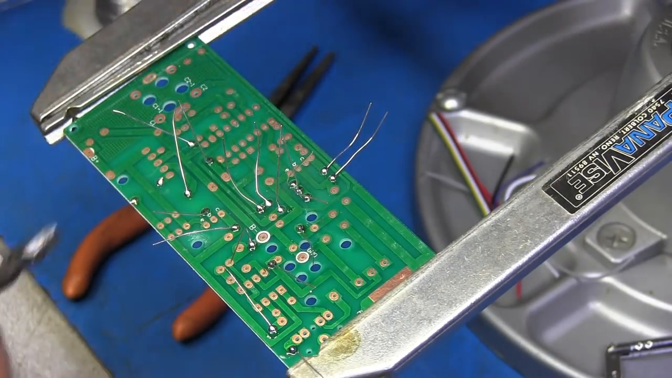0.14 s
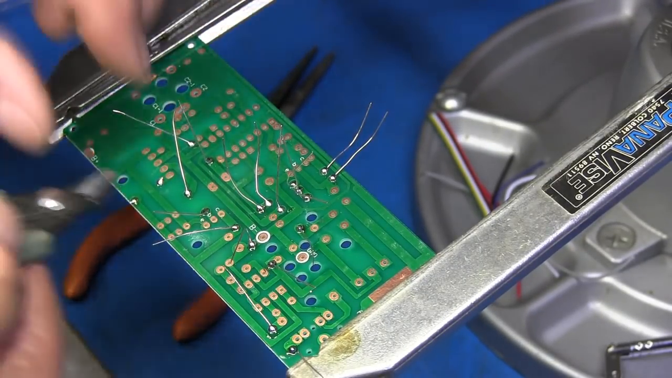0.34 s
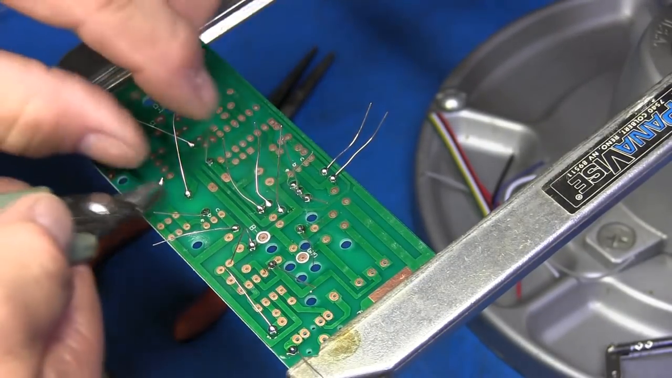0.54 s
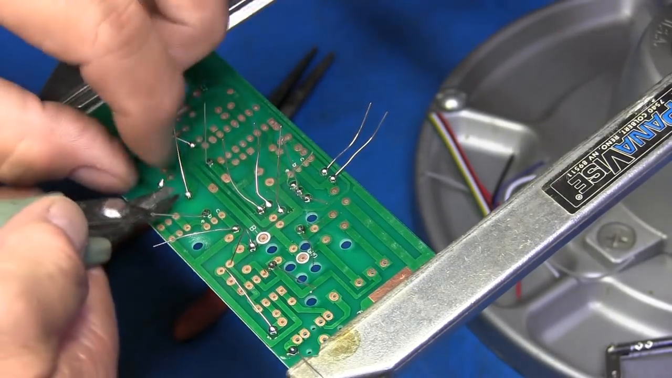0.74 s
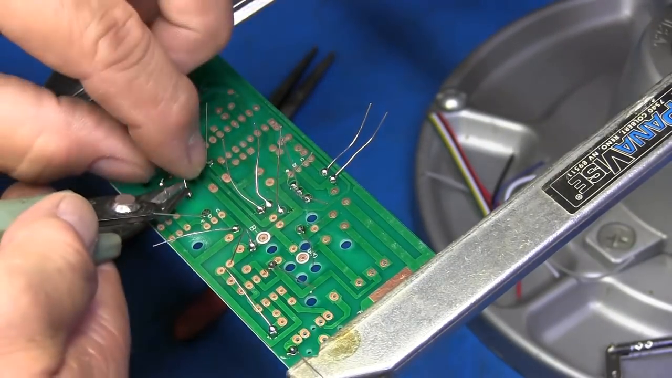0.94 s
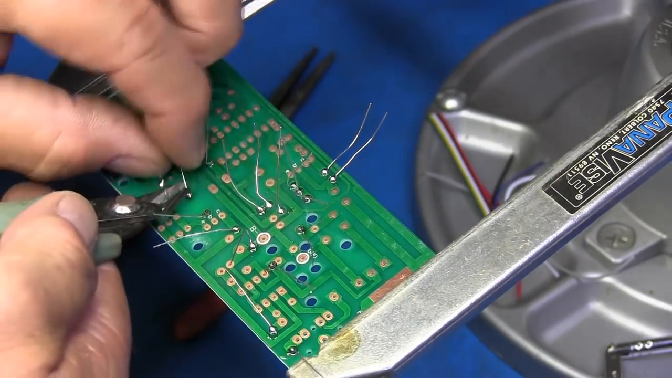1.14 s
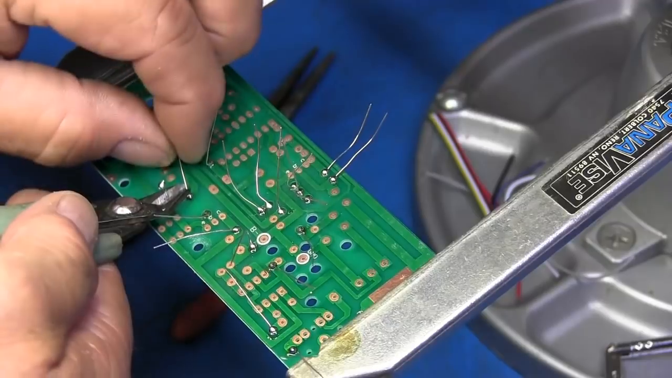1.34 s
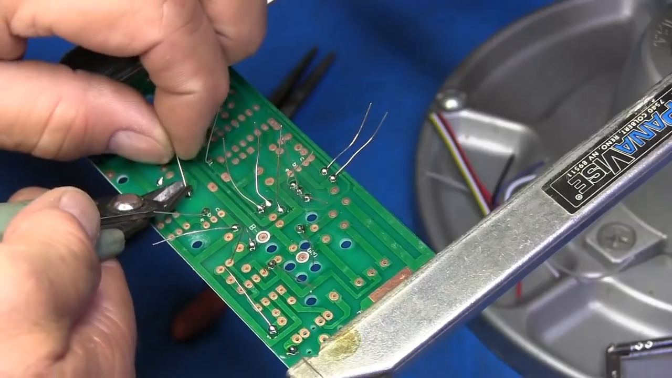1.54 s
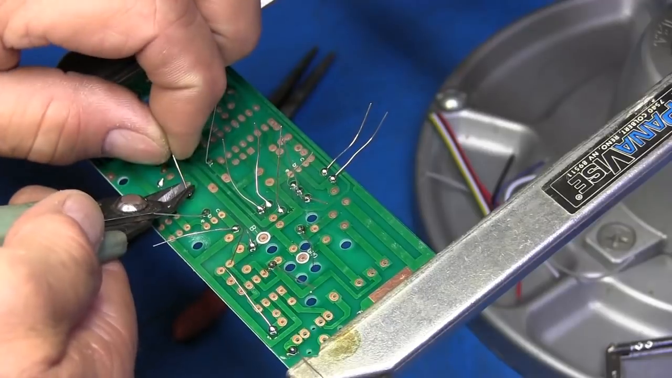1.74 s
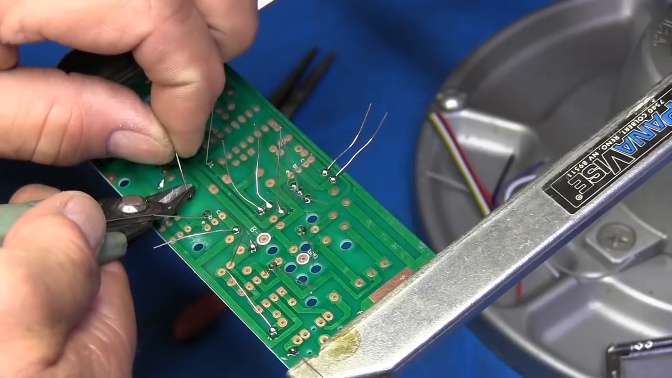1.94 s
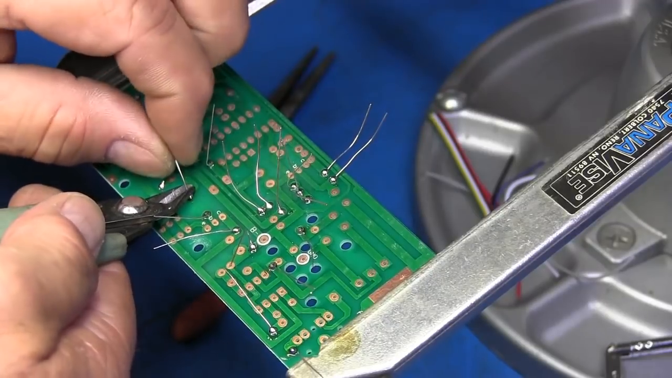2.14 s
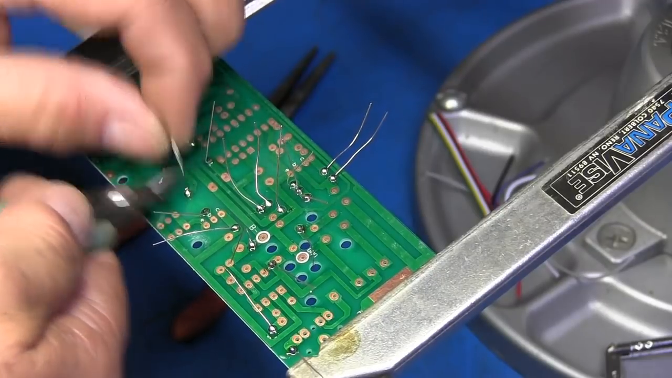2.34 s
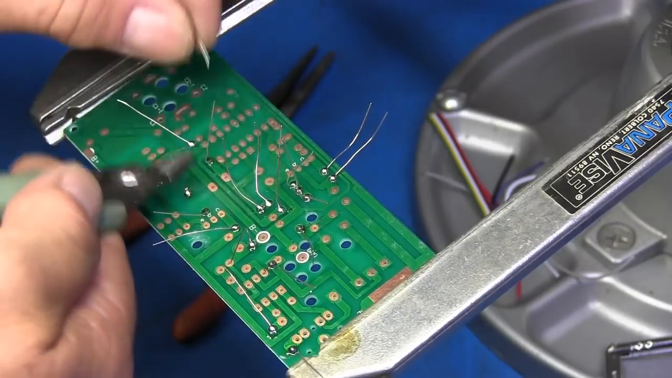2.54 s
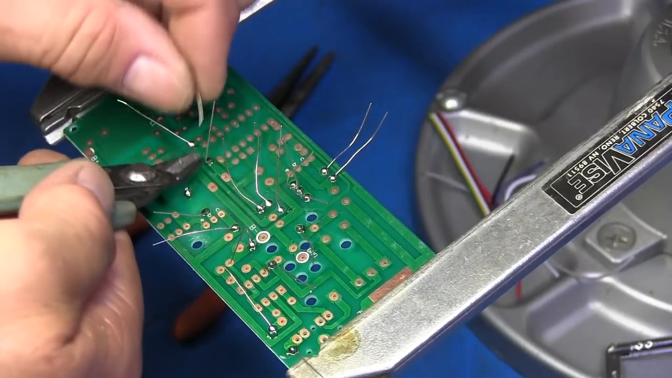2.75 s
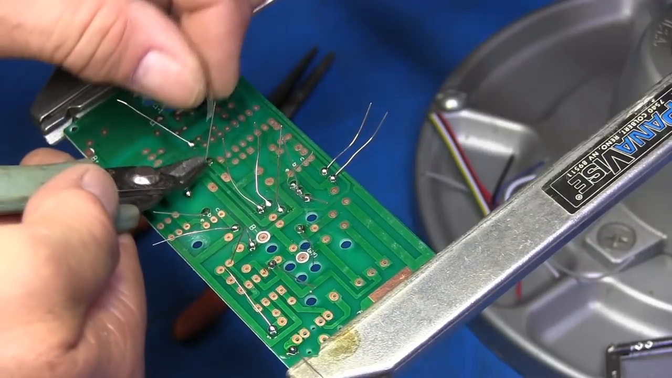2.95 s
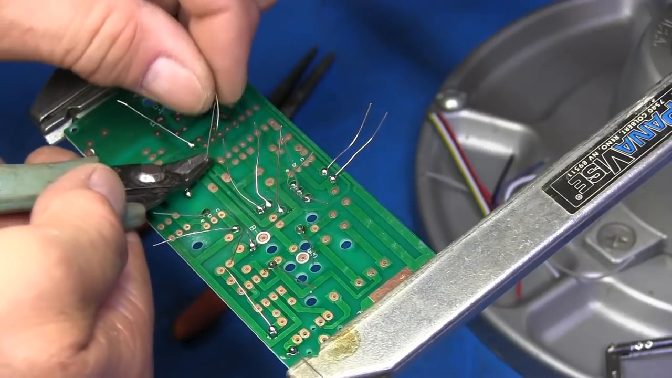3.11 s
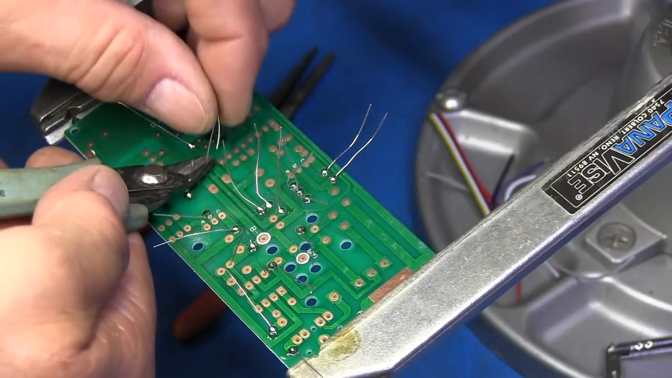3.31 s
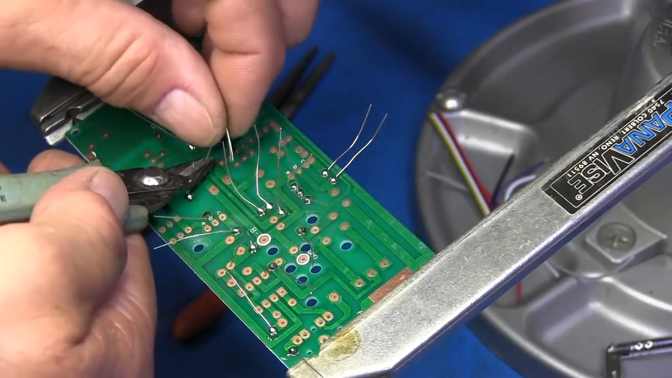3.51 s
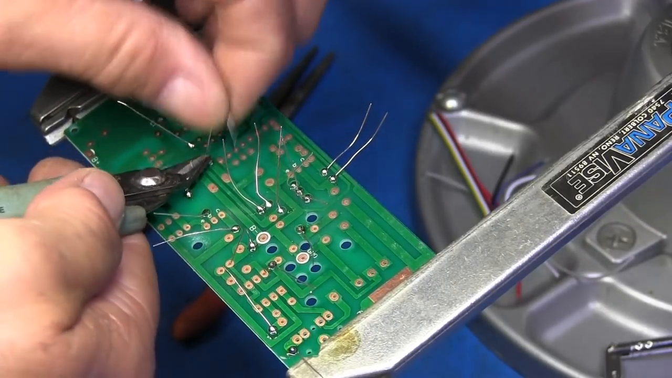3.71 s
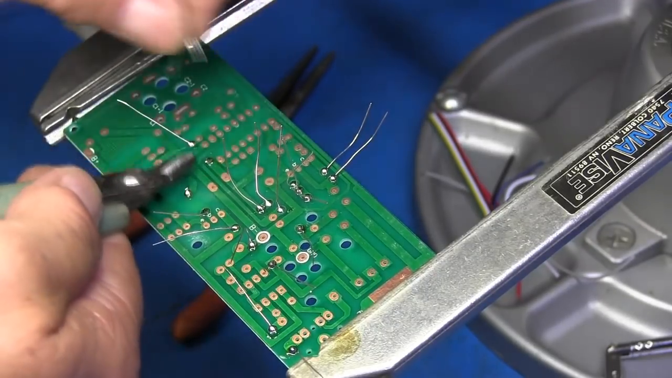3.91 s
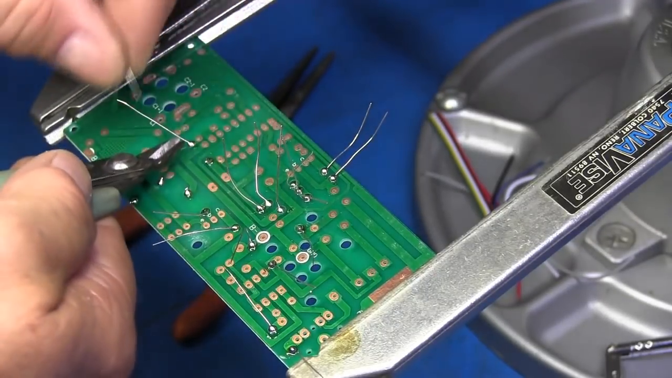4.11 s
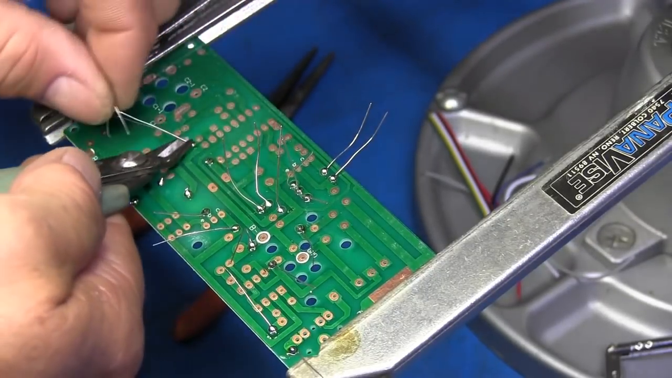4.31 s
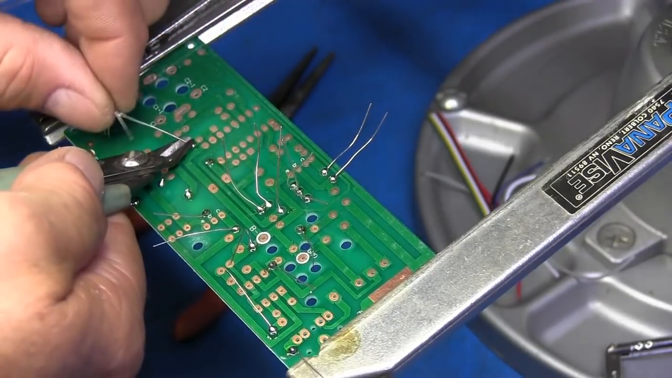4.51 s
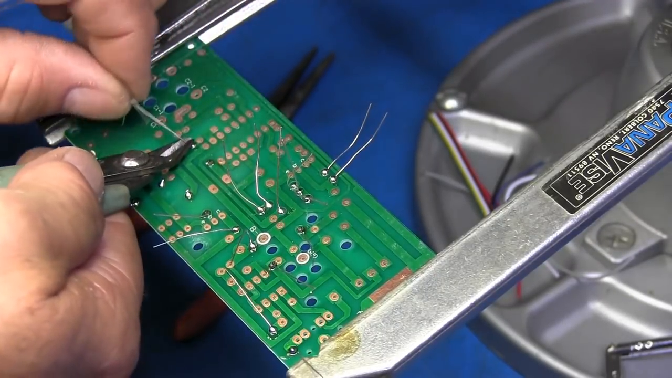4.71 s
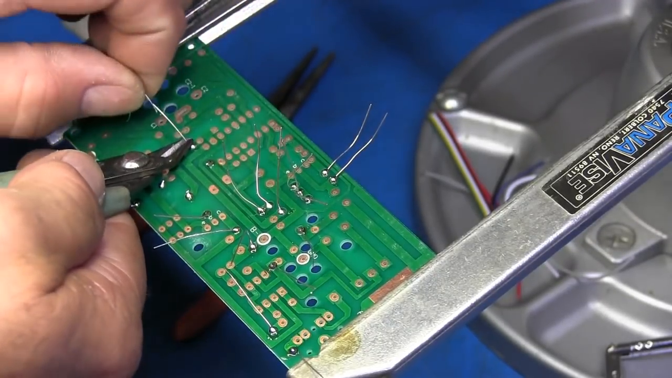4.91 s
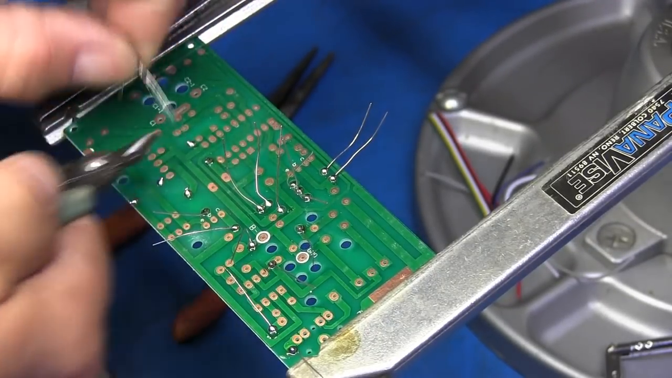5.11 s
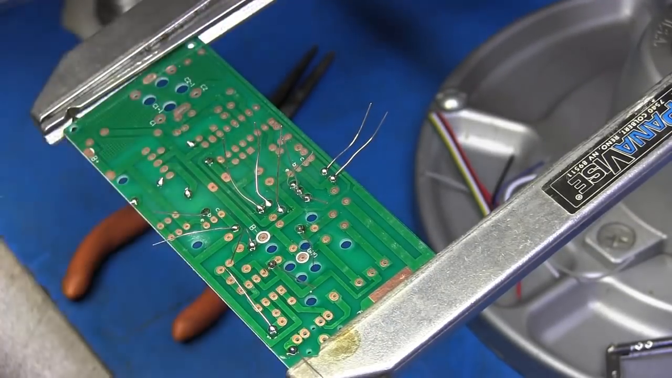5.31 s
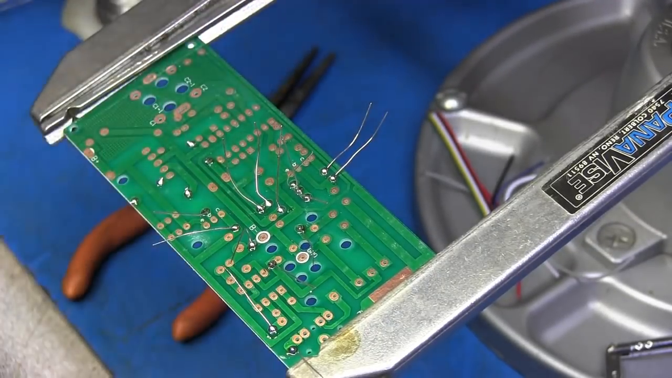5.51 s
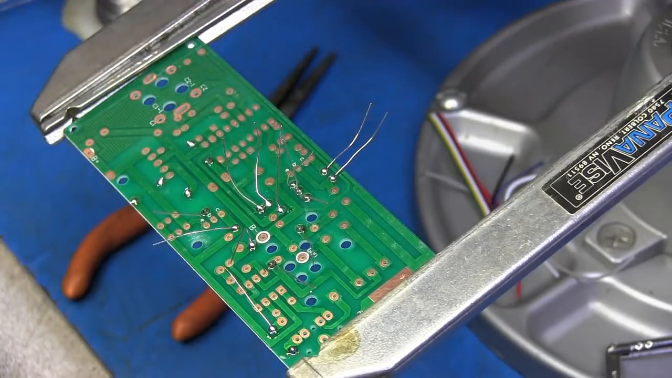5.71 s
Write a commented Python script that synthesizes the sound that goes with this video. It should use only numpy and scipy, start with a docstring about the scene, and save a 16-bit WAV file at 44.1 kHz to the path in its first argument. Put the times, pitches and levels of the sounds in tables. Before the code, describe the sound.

Small cutters snip two wire leads off a circuit board, with light metallic ticks and pings over a steady fan and faint hum.

```python
"""A small workshop, microphone close to a circuit board in a vice; an equipment fan and mains hum throughout.
First a caught lead pings, then flush cutters knock on the board and slide along the leads, spring tinking.
At 2.3 s the jaws bite through a lead and slam shut, a crack with a brief steel ring. More handling, a thin
electronic whine comes in, and at 3.7 s a second, louder snip. One more lead pings, the jaws knock a few
times, and the hands draw away with a soft brushing."""
import sys
import numpy as np
from scipy import signal
from scipy.fft import rfft, irfft
from scipy.io import wavfile
from scipy.ndimage import uniform_filter1d

SR = 44100
rng = np.random.default_rng(int(sys.argv[2]) if len(sys.argv) > 2 else 0)


def unload_wav(signal):
    """Save mono or channel-first audio to the path in sys.argv[1] as 16-bit WAV at rate SR, clipped to [-1, 1]."""
    wavfile.write(
        sys.argv[1],
        SR,
        np.round(np.clip(np.atleast_2d(signal).T, -1, 1) * 32767).astype(np.int16),
    )


N = 258426
TIME = np.arange(N) / SR
RING_TIME = TIME[:8000]  # time axis of one blow as it dies away
BAND_LIMIT_HZ = 15900

# fan and room air: freq_hz, relative_db
FAN_SPECTRUM = [(20, -18), (45, -14.5), (100, -12.5), (170, -5), (300, -3.5), (480, -10), (700, -15.5),
                (1300, -16.5), (2000, -21), (3000, -27), (5000, -33.5), (8000, -39), (12000, -43.5),
                (16000, -47.5)]
# resonances of housing and room: centre_hz, width_hz, lift_db
FAN_RESONANCES = [(184.3, 11.2, 6), (281, 20, 3), (299, 16, -3), (346, 23, 5.5), (386, 22, -4),
                  (419.6, 25, 4), (554.5, 45, 4), (819, 88, 5.5), (893, 25, 14), (1068, 69, 5.5),
                  (4040, 160, 1.5)]
# stereo width of the fan: freq_hz, side_db
FAN_SIDE = [(40, -20), (150, -14.5), (350, -11.5), (700, -8.5), (1200, -7), (3000, -5.5), (7000, -7.5),
            (14000, -36)]
# how the fan leans at the microphone: freq_hz, left_minus_right_db
FAN_BALANCE = [(60, -5.5), (130, -3.5), (290, -0.5), (640, 1.5), (1410, -0.5), (3100, 0.5), (6820, -0.5),
               (15000, 0.5)]
# tones of mains and motors: pitch_hz, rms_db, channel_phase_rad
HUM_TONES = [(36, -59.3, .3), (59.3, -60, .4), (71, -69, .4), (98, -66, .4), (120, -61, .4), (586, -65, .8),
             (875.7, -53.3, .8)]
# the whine and the brushing each come and go: start_s, attack_s, end_s, release_s, rms_db
WHINE_SWELL = (3.45, .12, 5.7, .15, -76.3)
BRUSH_SWELL = (5.15, .15, 5.72, .22, -63)

# first reflections off board, vice and bench: delay_s, gain
NEAR_ECHOES = [(.00021, 0.17), (.00048, 0.4), (.0015, .22), (.0086, 0.091)]
# decay of the room: freq_hz, t60_s
ROOM_DECAY = [(1000, 0.46), (2600, 0.15), (7000, 0.19), (10000, 0.15), (15000, 0.16)]
# stereo width of the reflections: freq_hz, side_db
REFLECTION_SIDE = [(1000, -4), (2500, -16), (4500, -5), (8000, -10), (13000, -12)]

# modes of cutters and board, struck at the tips or deep in the jaws: pitch_hz, tip_db, deep_db, t60_s
CUTTER_MODES = [(2183, 2, 3, .11), (2522, 0, -1, .10), (2790, -5, -8, .08), (3075, -7, 0, .11),
                (3950, -4, -8, .08), (4262, 2, -6, .09), (4665, -5, 4, .10), (4735, -1, -4, .10),
                (5360, -12, -1, .10), (5900, -6, -9, .07), (6952, -9, 1, .08), (7380, -2, -8, .07),
                (7530, -9, -2, .07), (8785, -2, -3, .09), (8930, -1, -9, .09), (9935, -14, 2, .06),
                (11650, -3, -12, .07), (12420, -10, -5, .065), (14480, -12, -8, .06)]
# steel touching the board: freq_hz, relative_db
TOUCH_SPECTRUM = [(200, -22), (1200, -2), (1800, -3), (2250, -6), (3100, 2), (3600, -5), (4300, 0),
                  (5200, -9), (7000, -10), (9200, -9), (15500, -13.5)]
# modes of the cutters' spring: pitch_hz, relative_db
SPRING_MODES = [(7700, -12), (8500, -15), (9800, -9), (11080, 0), (12080, -8)]
# the spring slips as the grip changes: start_s, level_db
SPRING_TINKS = [(0.9575, -22), (1.903, -37), (2.043, -34), (3.337, -33), (4.593, -29.5)]
# an edge slides along a lead: start_s, level_db, slide_s
LEAD_SCRAPES = [(1.212, -26.5, .018), (2.273, -26, .002), (2.479, -28.5, .0011), (3.009, -20.5, 0.013),
                (3.262, -27, 0.0024), (3.5406, -21.5, 0.0096), (3.898, -26, .001)]
# the jaws knock on the board: start_s, level_db, contact_s
BOARD_KNOCKS = [(0.8312, -16, 0.00033), (1.4822, -20.5, 0.0012), (3.172, -11.5, 0.0015), (4.3, -13, 0.005),
                (4.857, -23, 0.0034), (4.946, -20, .0022), (5.049, -15.5, 0.0033), (5.175, -23.5, 0.0029)]
# a lead's first bending mode, split in three: ratio_to_pitch, relative_db
LEAD_LOW_MODES = [(0.933, -4.5), (1.001, 1), (1.08, -5.5)]
# its higher bending modes: ratio_to_second_bend, relative_db
LEAD_HIGH_MODES = [(.825, -11.5), (.988, -6), (1.001, -1), (1.035, -5.5), (1.86, -14)]
# flicked leads: start_s, level_db, pitch_hz, second_bend_ratio, hardness_db, chatter_s, t60_s
LEAD_PINGS = [(0.641, -13.5, 4077, 2.506, -3, 0.0066, 0.039), (0.646, -12.5, 4084, 2.506, 1, 0.0012, 0.055),
              (1.047, -35, 7150, 2.7, -20, .015, .04), (2.408, -31, 8500, 2.7, -15, .003, .013),
              (2.951, -23, 3180, 2.7, -22, 0.0018, 0.022), (4.379, -14.5, 2865, 2.836, 3.5, 0.0022, 0.05)]
# the jaws slamming shut: freq_hz, relative_db
SNIP_SPECTRUM = [(200, -34), (1000, -15.5), (1750, -10), (2300, -1), (3200, 1), (3700, 0), (4600, 3.5),
                 (6200, -4.5), (7000, 0), (9500, -2.5), (11000, -5), (14500, -3.5), (16000, -33)]
# the two cuts: start_s, level_db, dull_hz, thin_hz, ring_db, room_db, depth (0 tips, 1 deep in the jaws)
LEAD_SNIPS = [(2.3158, -0.2, 8900, 1490, 1.5, -4.5, 0), (3.7302, 5.5, 15700, 600, -3.5, -2.5, 1)]


def amp(db):
    """Decibels to gain."""
    return np.exp(np.log(10) * np.asarray(db) / 20)


def unit(x):
    """Scales to an average energy of one per channel."""
    return x / np.sqrt(np.mean(np.sum(x ** 2, -1)) + 1e-20)


def read(points, hz):
    """Reads a table on a log-frequency axis."""
    freq_hz, value = np.transpose(points)
    return np.interp(np.log(hz + 1), np.log(freq_hz + 1), value)


def add(mix, start_s, sound):
    """Mixes a sound in at its start time."""
    part = mix[:, round(start_s * SR):][:, :sound.shape[-1]]
    part += sound[..., :part.shape[-1]]


def convolve(a, b):
    """Convolution along time, cut to the length of one ring."""
    return signal.fftconvolve(np.atleast_2d(a), np.atleast_2d(b), axes=1)[:, :len(RING_TIME)]


def noise(gain):
    """Noise of rms one, shaped by a gain for each frequency bin."""
    return unit(irfft(rfft(rng.standard_normal(N)) * gain, N)) * np.sqrt(N)


def spread(pair, side_points):
    """Takes two unrelated signals as mid and side; returns left and right."""
    size = pair.shape[-1]
    side = irfft(rfft(pair[1]) * amp(read(side_points, np.fft.rfftfreq(size, 1 / SR))), size)
    return np.array([pair[0] + side, pair[0] - side])


def swell(start_s, attack_s, end_s, release_s, db):
    """A gain that rises, holds and falls away."""
    return amp(db) * np.clip(np.minimum((TIME - start_s) / attack_s, (end_s - TIME) / release_s), 0, 1)


def fan(level_db=-39.5):
    """The room tone: steady air noise, coloured by the resonances of housing and room."""
    hz = np.fft.rfftfreq(N, 1 / SR)
    lift_db = sum(db * .5 ** ((2 * (hz - centre) / width) ** 2) for centre, width, db in FAN_RESONANCES)
    side_power_db = 10 * np.log10(1 + amp(read(FAN_SIDE, hz)) ** 2)
    colour = amp(read(FAN_SPECTRUM, hz) + lift_db - side_power_db)
    air = spread(np.array([noise(colour), noise(colour)]), FAN_SIDE)
    lean = amp(np.outer([.5, -.5], read(FAN_BALANCE, hz)))
    return amp(level_db) * irfft(rfft(air) * lean, N)


def hum(waver_rad=0.63, waver_hz=2.2):
    """Tones of mains and motors, the higher ones wavering a little."""
    waver = waver_rad * noise(np.exp(-np.fft.rfftfreq(N, 1 / SR) / waver_hz))
    out, top_hz = np.zeros((2, N)), HUM_TONES[-1][0]
    for hz, db, apart_rad in HUM_TONES:
        phase = 2 * np.pi * (hz * TIME + rng.random()) + waver * hz / top_hz
        out += amp(db) * np.sin([phase + apart_rad / 2, phase - apart_rad / 2])
    return np.sqrt(2) * out


def whine(pitch_hz=13184):
    """A thin electronic tone far above the hum."""
    return np.sqrt(2) * swell(*WHINE_SWELL) * np.sin(2 * np.pi * pitch_hz * TIME)


def brush(centre_hz=11000, width_hz=6000):
    """Fine, high friction noise as the hands draw away."""
    hz = np.fft.rfftfreq(N, 1 / SR)
    return swell(*BRUSH_SWELL) * noise(np.exp(-((hz - centre_hz) / width_hz) ** 2))


def scatter(t60_s):
    """Dense dying reflections, evened out in colour."""
    fade = amp(-60 * RING_TIME / t60_s)
    spectrum = rfft(rng.standard_normal((2, len(RING_TIME))) * fade)
    colour = np.sqrt(uniform_filter1d(abs(spectrum) ** 2, size=80, axis=1))
    return unit(irfft(spectrum / colour, len(RING_TIME)) * (RING_TIME < 2 * t60_s))


def workshop(room_db, vice_db=-4, vice_t60_s=0.012, bench_db=-0.6, bench_t60_s=0.046, build_s=0.0051):
    """The path to the close microphone: direct sound, echoes, vice and bench scatter, short room tail."""
    direct = np.zeros(len(RING_TIME))
    direct[0] = 1
    for delay_s, gain in NEAR_ECHOES:
        direct[round(delay_s * SR)] += gain
    near = amp(vice_db) * scatter(vice_t60_s) + amp(bench_db) * scatter(bench_t60_s)
    hz, t, bands = signal.stft(rng.standard_normal((2, len(RING_TIME))), SR, nperseg=128)
    fade = amp(-60 * t / read(ROOM_DECAY, hz)[:, None])
    tail = signal.istft(bands * fade, SR)[1][:, :len(RING_TIME)]
    tail *= 1 - np.exp(-RING_TIME / build_s)  # wall reflections take a moment to gather
    return direct + spread(near + amp(room_db) * unit(tail), REFLECTION_SIDE)


def contact(hz, dull_hz, thin_hz):
    """Softer contact dulls a blow above dull_hz, lighter contact thins it below thin_hz."""
    return 1 / np.sqrt((1 + (hz / dull_hz) ** 4) * (1 + (thin_hz / hz) ** 2))


def crack(spectrum, dull_hz, thin_hz, size=2048):
    """The pulse of one blow, its energy packed at the start."""
    hz = abs(np.fft.fftfreq(size, 1 / SR)) + 1
    gain = amp(read(spectrum, hz)) * contact(hz, dull_hz, thin_hz)
    minimum_phase = np.exp(np.conj(signal.hilbert(np.log(gain))))
    return unit(np.fft.ifft(minimum_phase).real)


def jaw_ring(dull_hz, thin_hz, depth=0.23, skew_rad=.45, narrow_hz=7000):
    """The dying modes of cutters and board; the place of the blow decides which ones speak."""
    hz, tip_db, deep_db, t60_s = np.transpose(CUTTER_MODES)[:, :, None]
    db = tip_db + depth * (deep_db - tip_db)
    envelopes = contact(hz, dull_hz, thin_hz) * amp(db - 60 * RING_TIME / t60_s)
    # the lower modes reach the two channels a little out of step
    skew = skew_rad * rng.choice([-1, 1], hz.shape) / (1 + (hz / narrow_hz) ** 4)
    phase = 2 * np.pi * (hz * RING_TIME + rng.random(hz.shape)) + np.array([skew, -skew])
    return unit((envelopes * np.sin(phase)).sum(1))


def chatter(decay_s, even_s):
    """A first contact, then a dying run of tiny slips, equal to it in energy when decay_s is even_s."""
    slips = rng.standard_normal(len(RING_TIME)) * (rng.random(len(RING_TIME)) < .15)
    return (RING_TIME == 0) + decay_s / even_s * unit(slips * np.exp(-RING_TIME / decay_s))


def touch(room, dull_hz, thin_hz, scrape_s, ring_db=-5):
    """A light touch ticks and rings steel and board; the longer the scrape, the more of it is slips."""
    slips = chatter(scrape_s, even_s=0.0032)
    tick = convolve(crack(TOUCH_SPECTRUM, dull_hz, thin_hz), slips)
    return unit(convolve(tick, room)) + amp(ring_db) * jaw_ring(dull_hz / 2, thin_hz)


def wire_ring(room, partials, t60_s, chatter_s):
    """A wire chatters on the steel and rings with its partials: pitch_hz, level_db."""
    drive = convolve(chatter(chatter_s, even_s=0.0047), room)
    fade = amp(-60 * RING_TIME / t60_s)
    return sum(amp(db) * unit(convolve(np.sin(2 * np.pi * hz * RING_TIME) * fade, drive))
               for hz, db in partials if hz < BAND_LIMIT_HZ)


def strays(from_s=0.41, to_s=5.8, per_s=1, softest_db=-43.5, range_db=14):
    """Barely heard touches at chance moments while the hands are at the board."""
    out, room = np.zeros((2, N)), workshop(room_db=-4)
    span_s = to_s - from_s
    for when, strength in rng.random((round(per_s * span_s), 2)):
        tick = touch(room, dull_hz=8000, thin_hz=4000, scrape_s=.004)
        add(out, from_s + when * span_s, amp(softest_db + range_db * strength) * tick)
    return out


def tinks(tick_db=-6):
    """The spring slips in its seat with a tiny tick and the same high ring each time."""
    out, room = np.zeros((2, N)), workshop(room_db=-4)
    for start_s, db in SPRING_TINKS:
        tick = amp(tick_db) * touch(room, dull_hz=9500, thin_hz=20000, scrape_s=.003)
        ring = wire_ring(room, SPRING_MODES, t60_s=0.013, chatter_s=0.0023)
        add(out, start_s, amp(db) * (ring + tick))
    return out


def scrapes():
    """The cutting edges slide down a lead to find their place, thin and bright."""
    out, room = np.zeros((2, N)), workshop(room_db=-1)
    for start_s, db, slide_s in LEAD_SCRAPES:
        add(out, start_s, amp(db) * touch(room, dull_hz=11500, thin_hz=9000, scrape_s=slide_s))
    return out


def knocks(brief_s=0.00065, brief_dull_hz=7400, softening=0.28):
    """The jaws meet the board; a longer contact is a softer one and gives a duller knock."""
    out, room = np.zeros((2, N)), workshop(room_db=-3.5)
    for start_s, db, contact_s in BOARD_KNOCKS:
        dull_hz = brief_dull_hz * (brief_s / contact_s) ** softening
        add(out, start_s, amp(db) * touch(room, dull_hz, thin_hz=950, scrape_s=contact_s))
    return out


def pings(rasp_db=-5, even_s=0.0033):
    """A lead slips off the jaws and rings; a harder flick adds overtones, longer chatter a bright rasp."""
    out, room = np.zeros((2, N)), workshop(room_db=-5)
    for start_s, db, hz, second_bend, hardness_db, chatter_s, t60_s in LEAD_PINGS:
        partials = [(hz * ratio, mode_db) for ratio, mode_db in LEAD_LOW_MODES]
        partials += [(hz * second_bend * ratio, mode_db + hardness_db)
                     for ratio, mode_db in LEAD_HIGH_MODES]
        rasp_gain = amp(rasp_db + hardness_db) * chatter_s / even_s
        rasp = rasp_gain * touch(room, dull_hz=20000, thin_hz=30000, scrape_s=chatter_s)
        add(out, start_s, amp(db) * (wire_ring(room, partials, t60_s, chatter_s) + rasp))
    return out


def snips():
    """Close to the microphone the lead parts at once: the jaws slam shut with a crack and ring briefly."""
    out = np.zeros((2, N))
    for start_s, db, dull_hz, thin_hz, ring_db, room_db, depth in LEAD_SNIPS:
        blow = convolve(crack(SNIP_SPECTRUM, dull_hz, thin_hz), workshop(room_db))
        ring = amp(ring_db) * jaw_ring(dull_hz, thin_hz, depth)
        add(out, start_s, amp(db) * (blow + ring))
    return out


def scene():
    """Close work at the board, with the drone of the workshop behind it."""
    cutters = snips() + knocks() + scrapes() + strays() + pings() + tinks()
    return cutters + fan() + hum() + whine() + brush()


def record(dry, ceiling=.92):
    """Peaks are held just below full scale; a low-pass then ends the treble at the recorder's cut-off."""
    limited = np.clip(dry, -ceiling, ceiling)
    lowpass = signal.firwin(301, BAND_LIMIT_HZ, window=("kaiser", 9), fs=SR)
    return signal.oaconvolve(limited, lowpass[None], "same")


dry = scene()
out = record(dry)
unload_wav(out)
```